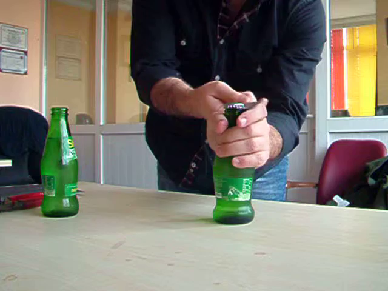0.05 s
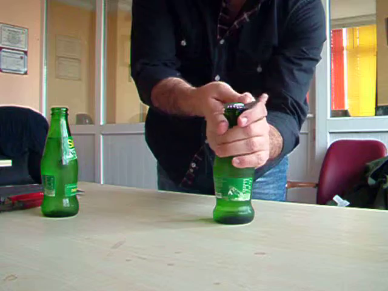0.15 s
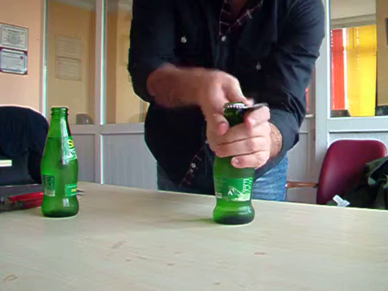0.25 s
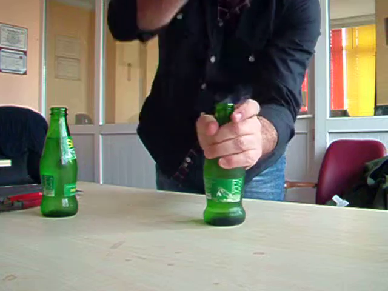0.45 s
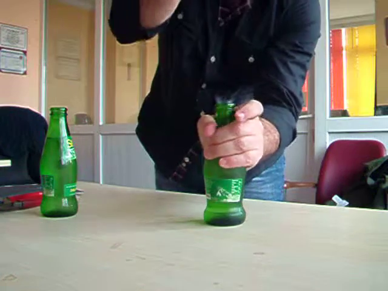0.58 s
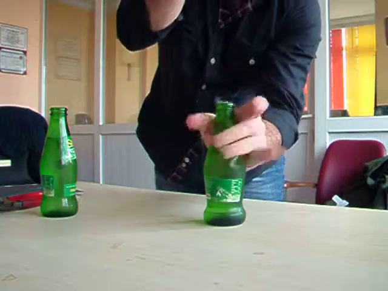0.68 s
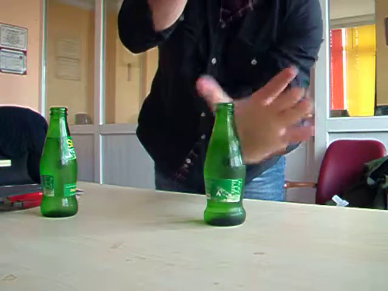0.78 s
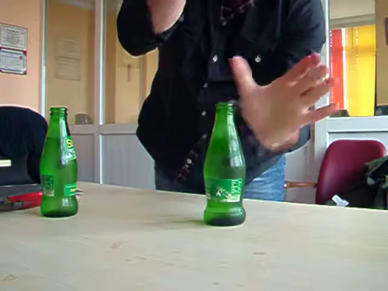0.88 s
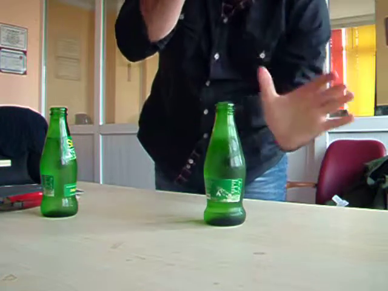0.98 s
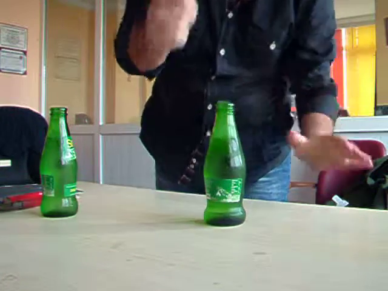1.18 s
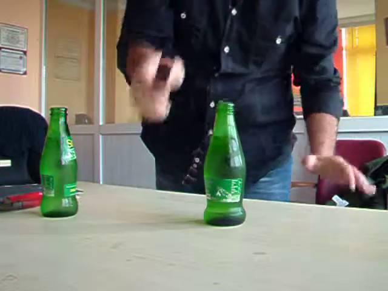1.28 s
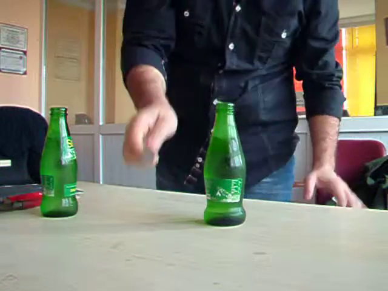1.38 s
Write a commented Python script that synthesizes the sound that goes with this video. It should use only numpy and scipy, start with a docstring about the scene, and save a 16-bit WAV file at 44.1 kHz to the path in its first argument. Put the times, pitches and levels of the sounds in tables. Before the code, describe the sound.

A glass bottle is opened with a sharp pop. It first scuffs and judders on a table as the opener scrapes, and gas hisses very briefly. At about 0.35 seconds comes the loud, hollow pop, overloading the microphone and echoing in a bare room. The metal cap pings at 0.5 seconds, taps dully at 0.7 and pings softly near 1 second, over faint hiss and electrical whine.

```python
"""A glass bottle pops open on a table in a bare, echoing room, overloading the microphone.
First the gripped bottle scuffs and judders, the opener scrapes and gas hisses under the lifting cap.
Then the pressure escapes in one push: the neck and steel opener ring, and room resonances linger.
The crown cap flies off, pings, taps something dull and pings again, over faint hiss and electrical whine."""
import sys
import numpy as np
from scipy import signal
from scipy.fft import rfft, irfft
from scipy.io import wavfile

SR = 44100
rng = np.random.default_rng(int(sys.argv[2]) if len(sys.argv) > 2 else 0)


def generate_wav(signal):
    """Clip the signal to [-1, 1] and save it as 16-bit WAV at the path in sys.argv[1]."""
    frames = np.transpose(np.atleast_2d(signal))
    scaled = np.clip(frames, -1, 1) * 32767
    pcm = np.round(scaled).astype(np.int16)
    wavfile.write(sys.argv[1], SR, pcm)


N = 63945
POP_S = .3466

# The tone of the blast. Each row: frequency in Hz, relative level in dB.
BLAST_SPECTRUM = [(30, 2.5), (80, -14), (150, -1.5), (250, -5.5), (450, 2.5), (750, 0), (1150, -7),
                  (1700, 3.5), (2300, -4), (2800, -9.5), (4000, -13.5), (6000, -10.5), (8000, -23.5)]


def blast():
    """The seal lets go and the pressure in the neck escapes in one push."""
    return undb(18) * colour(impulse(POP_S), BLAST_SPECTRUM)


# The pop's hollow note: the bottle neck's ring, with room resonances lingering around it.
# Each row: frequency in Hz, level in dB, T60 in seconds.
HOLLOW_MODES = [(910.5, -1, 0.046), (914, -22.5, .4), (655, -15.5, 0.011), (503, -20, 0.054),
                (1527, -19, 0.1), (1852, -26, 0.38)]


def hollow_note():
    """The pop sets the bottle neck ringing, and room resonances linger around it."""
    return ring(POP_S, HOLLOW_MODES)


# Resonances of the opener. Each row: frequency in Hz, level in dB, T60 in seconds.
OPENER_MODES = [(3430, -15.5, 0.035), (4250, -10, 0.029), (4880, -26, .025), (6144, -23.5, 0.038)]


def opener():
    """The steel opener rings briefly as the cap lets it go."""
    return ring(POP_S, OPENER_MODES)


# The cap's ring, main mode first, retuned for each ping.
# Each row: frequency in Hz, relative level in dB, T60 in seconds.
CAP_MODES = [(5586, 4.5, 0.021), (5340, -20, 0.079), (5800, -26, 0.042), (5635, -22.5, 0.38)]
# The click of its rim. Each row: frequency in Hz, relative level in dB.
CLICK_SPECTRUM = [(100, -47.5), (800, -19), (1800, -25.5), (2450, -2), (4300, -0.5), (5400, -10), (6200, 5),
                  (7500, -2.5), (8500, -4)]
# The cap's hard contacts. Each row: start in seconds, ring gain in dB, click gain in dB,
# pitch of the main mode in Hz, attack of the ring in seconds.
CAP_PINGS = [(0.4945, -10, -5.5, 5535, 0.00013), (0.4969, -8, -3, 5535, 0.0011),
             (1.0303, -22, -22, 5564, 0.0018)]


def cap_pings():
    """The steel cap clicks and rings as it lands on two edges; a later glancing touch is softer."""
    out = 0
    for at, ring_db, click_db, hz, attack_s in CAP_PINGS:
        age = np.maximum(clock() - at, 0)
        attack = 1 - np.exp(-(age / attack_s) ** 2)
        ping = undb(ring_db) * attack * ring(at, CAP_MODES, stretch=hz / CAP_MODES[0][0])
        click = undb(click_db) * colour(impulse(at), CLICK_SPECTRUM)
        out = out + ping + click
    return out


# Light touches between the pings. Each row: start in seconds, level in dB.
TAP_TOUCHES = [(0.6847, -29), (0.6865, -15), (0.696, -28)]
# Their dull tone. Each row: frequency in Hz, relative level in dB.
TAP_SPECTRUM = [(60, -3), (150, -33), (350, 1.5), (900, -5.5), (1700, -0.5), (2700, 7), (3300, -6.5),
                (7000, -13)]


def cap_taps():
    """The cap clatters briefly against something dull, with no ring."""
    touches = sum(undb(db) * impulse(at) for at, db in TAP_TOUCHES)
    return colour(touches, TAP_SPECTRUM)


# The hiss of gas under the cap. Each row: frequency in Hz, relative level in dB.
LEAK_SPECTRUM = [(800, -14.5), (2300, -23), (3000, -12.5), (3500, 0), (4300, -1), (5200, 0.5), (6100, -2),
                 (7000, -10.5), (8500, -8.5)]


def gas_leak():
    """Gas seeps, then rushes, through the widening gap just ahead of the pop."""
    peak_s, fall_s = .3452, .003
    seep = undb(-19) * swell(peak_s, rise_s=.0078, fall_s=fall_s)
    rush = undb(-16) * swell(peak_s, rise_s=.0041, fall_s=fall_s)
    return (seep + rush) * colour(rng.standard_normal(N), LEAK_SPECTRUM)


# The bottle's low scuff on the table. Each row: frequency in Hz, relative level in dB.
SCUFF_SPECTRUM = [(25, -8), (55, -4), (78, -11.5), (130, -1.5), (250, -4.5), (360, -2.5), (600, -3.5),
                  (800, -15), (1500, -21.5), (4000, -31), (8000, -41)]
# The opener's brighter scrape on the rim. Each row: frequency in Hz, relative level in dB.
SCRAPE_SPECTRUM = [(600, -9.5), (1100, -3.5), (1400, 5), (1650, -1.5), (2000, -1), (3000, -5.5),
                   (4200, -6.5), (6000, -10.5), (8000, -12.5)]


def levering():
    """The bottle scuffs on the table and the opener scrapes the rim until the cap gives."""
    t = clock()
    load_db, load_rise_s, scrape_start_s = 5, .031, .228
    sealed = t < POP_S
    # The scuffing swells as the lever is pressed home.
    load = undb(load_db * np.exp(-np.abs(t - POP_S) / load_rise_s)) * sealed
    scuff = colour(grains(per_second=900) * load, SCUFF_SPECTRUM)
    scrape = colour(grains(per_second=2500) * (t > scrape_start_s) * sealed, SCRAPE_SPECTRUM)
    return undb(-36.5) * scuff + undb(-41) * scrape


# Slips of the bottle. Each row: time of the peak in seconds, pitch in Hz, level in dB.
BOTTLE_SLIPS = [(0.2300, 372, -12), (0.258, 341, -14), (0.277, 385, -18), (0.297, 480, -24)]
# What rings at each slip. Each row: multiple of the pitch, relative level in dB.
SLIP_PARTIALS = [(1, 1), (1.27, -12), (1.68, -13.5), (2.06, -18.5), (3.9, -30.5)]


def judder():
    """Each slip under the lever's load is a short low groan of bottle and table."""
    out = 0
    for at, hz, db in BOTTLE_SLIPS:
        phase = 2 * np.pi * hz * (clock() - at)
        tone = sum(undb(mode_db) * np.cos(multiple * phase) for multiple, mode_db in SLIP_PARTIALS)
        out = out + undb(db) * swell(at, rise_s=.0044, fall_s=.011) * tone
    return out


# Early reflections. Each row: delay in seconds, level in dB.
ROOM_ECHOES = [(.0088, -13.5), (0.0258, -15.5), (0.046, -22)]
# The reverb tail. Each row: band centre in Hz, T60 in seconds, relative level in dB.
TAIL_BANDS = [(58.4, .22, -29), (140, 0.25, -7.5), (350, 0.44, -6.5), (865, 0.52, -0.5), (1800, 0.47, 1.5),
              (5500, 0.56, -3), (8500, .45, 0.5)]


def room(x):
    """The bare room returns a few distinct echoes and a diffuse tail that decays band by band."""
    t, hz = clock(), np.arange(N // 2 + 1) * SR / N
    noise, tail = rfft(rng.standard_normal(N)), 0
    for centre, t60, db in TAIL_BANDS:
        weight = on_log_axis([(row[0], row[0] == centre) for row in TAIL_BANDS], hz)
        band = irfft(noise * weight, N)
        tail = tail + undb(db) * band * np.exp(-np.log(1000) * t / t60)
    tail = tail * (1 - np.exp(-t / .002))  # 2 ms build-up
    echoes = sum(undb(db) * impulse(at) for at, db in ROOM_ECHOES)
    return convolve(x, undb(-.5) * tail / np.linalg.norm(tail) + echoes)


# Microphone hiss. Each row: frequency in Hz, relative level in dB.
HISS_SPECTRUM = [(25, -2.5), (100, -2.5), (300, 0.5), (800, -1), (2000, -0.5), (5000, -0.5), (7500, -2),
                 (8500, -4.5)]
# Electrical whine. Each row: frequency in Hz, RMS level in dB.
WHINE_TONES = [(1304, -62), (3171, -67.5), (3528, -65.5), (5201, -67.5), (6696, -67.5), (7067.5, -57)]


def noise_floor():
    """A bed of even microphone hiss with thin, steady electrical tones."""
    whine = sum(undb(db) * np.sqrt(2) * np.sin(2 * np.pi * (hz * clock() + rng.random()))
                for hz, db in WHINE_TONES)
    return undb(-51) * colour(rng.standard_normal(N), HISS_SPECTRUM) + whine


def undb(db):
    """Decibels to gain."""
    return 10 ** (np.asarray(db) / 20)


def clock():
    """Time of every sample in seconds."""
    return np.arange(N) / SR


def impulse(at):
    """A single push."""
    return 1. * (np.arange(N) == int(at * SR))


def swell(at, rise_s, fall_s):
    """Exponential rise to a peak, then exponential fall."""
    t = clock() - at
    return np.exp(np.minimum(t / rise_s, -t / fall_s))


def grains(per_second, spread_db=.5):
    """Random stick-slip pushes of slightly uneven size, RMS 1."""
    pushes = (rng.random(N) < per_second / SR) * rng.choice([-1, 1], N)
    pushes = pushes * undb(spread_db * rng.standard_normal(N))
    return pushes / pushes.std()


def ring(at, modes, stretch=1):
    """Decaying modes set off at one moment; stretch scales their pitch."""
    t = np.maximum(clock() - at, 0)
    return sum(undb(db) * np.sin(2 * np.pi * hz * stretch * t) * np.exp(-np.log(1000) * t / t60)
               for hz, db, t60 in modes)


def on_log_axis(points, hz):
    """Interpolate (Hz, value) points on a log frequency axis."""
    f, value = np.array(points, float).T
    return np.interp(np.log(np.maximum(hz, 1)), np.log(f), value)


def convolve(x, response):
    """Pass a sound through an impulse response."""
    return signal.fftconvolve(x, response)[:N]


def colour(x, spectrum):
    """Minimum-phase EQ of unit energy with the given spectrum, rolled off above 9 kHz."""
    size = 8192
    hz = np.arange(size // 2 + 1) * SR / size
    db = on_log_axis(spectrum, hz) - 40 * np.clip(hz / 9000 - 1, 0, 1)
    cepstrum = irfft(np.log(undb(db)))
    # Folding the cepstrum keeps attacks free of pre-ring.
    cepstrum[1:size // 2] *= 2
    cepstrum[size // 2 + 1:] = 0
    response = irfft(np.exp(rfft(cepstrum)))
    return convolve(x, response / np.linalg.norm(response))


def scene():
    """Each source is heard directly and through the room, over the noise floor."""
    # Each pair: sound, reverb send in dB.
    sources = [(blast(), -6.5), (hollow_note(), -7.5), (opener(), -13.5),
               (cap_pings(), 5), (cap_taps(), 1),
               (levering(), -3.5), (judder(), -1.5), (gas_leak(), -15)]
    direct = sum(sound for sound, _ in sources)
    send = sum(undb(send_db) * sound for sound, send_db in sources)
    return (direct + room(send) + noise_floor())[None]


def record(dry):
    """A narrow-band microphone channel overloads and flattens the loudest peaks."""
    band_hz, stop_hz, top_hz = 7744, 8700, 15800
    clip_level, dc_offset = .72, .003
    x = signal.sosfilt(signal.butter(14, band_hz, fs=SR, output="sos"), dry)
    x = signal.sosfilt(signal.ellip(10, .1, 80, stop_hz, fs=SR, output="sos"), x)
    clipped = np.clip(x + dc_offset, -clip_level, clip_level)
    return signal.sosfilt(signal.ellip(8, .2, 70, top_hz, fs=SR, output="sos"), clipped)


dry = scene()
out = record(dry)
generate_wav(out)
```